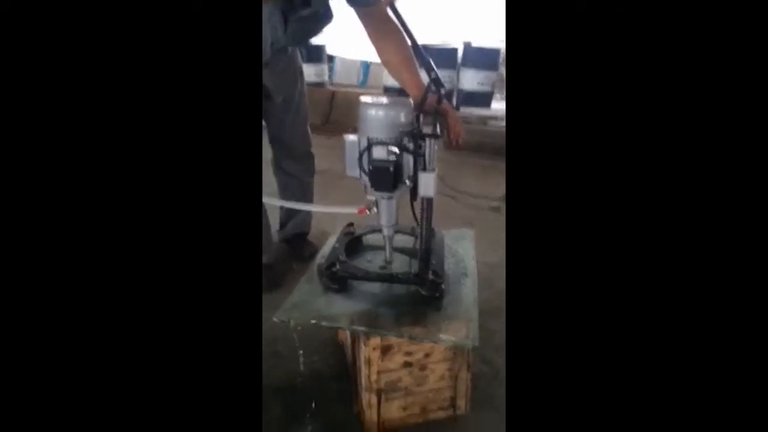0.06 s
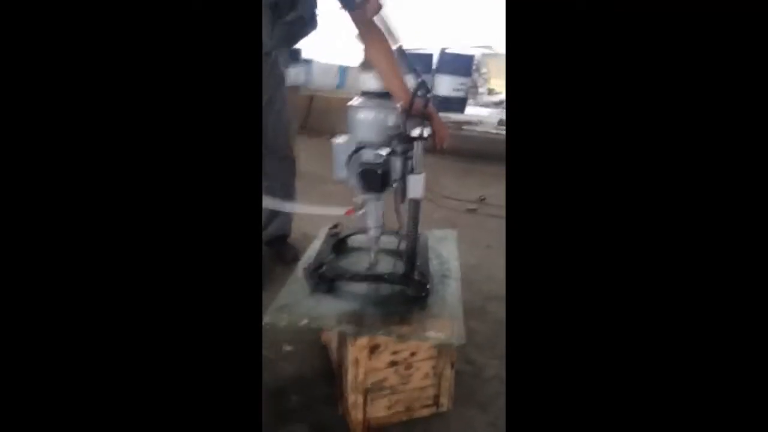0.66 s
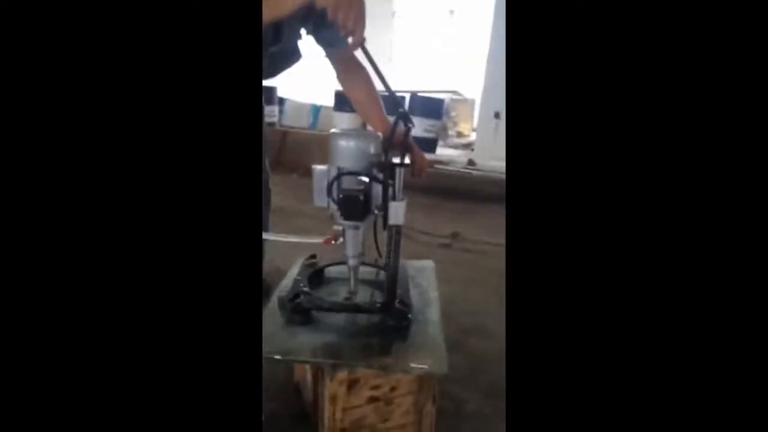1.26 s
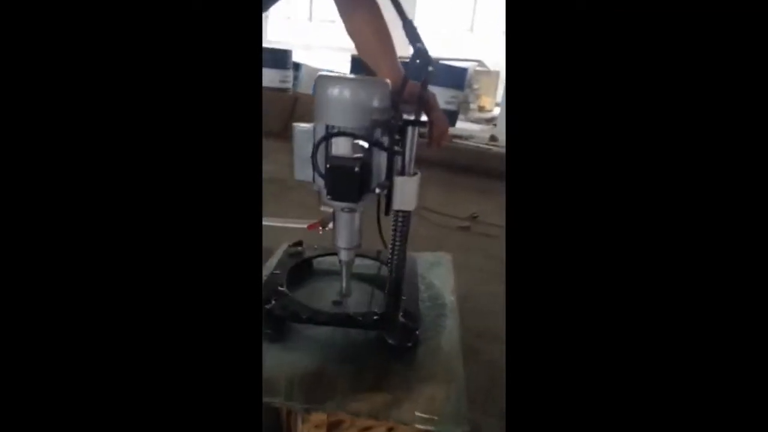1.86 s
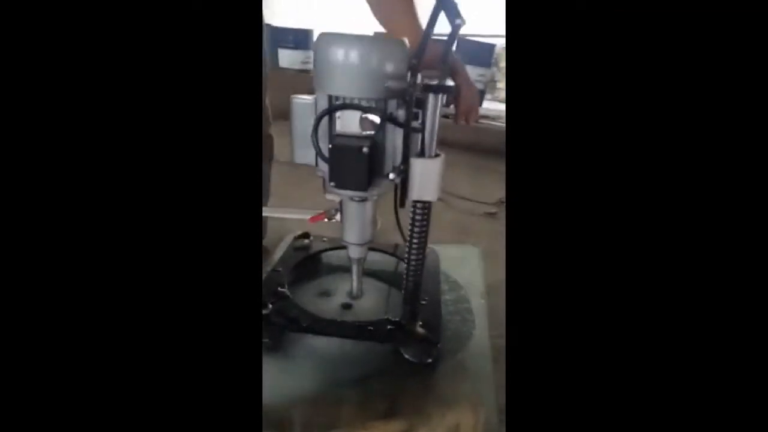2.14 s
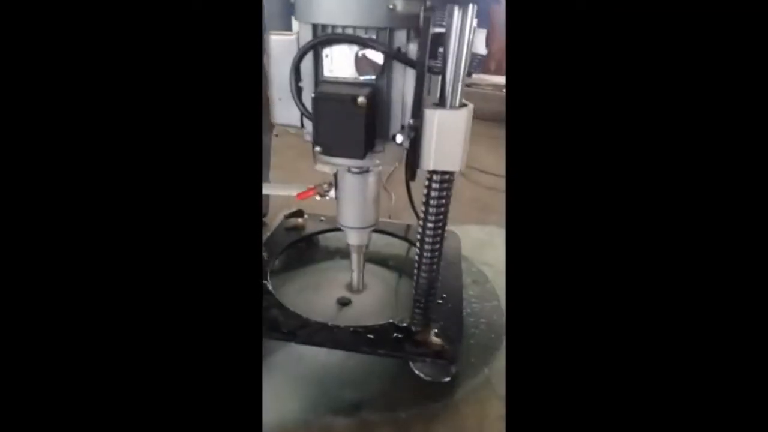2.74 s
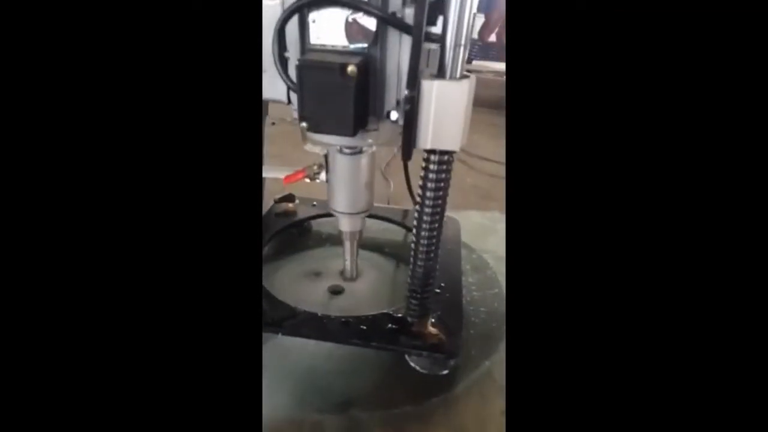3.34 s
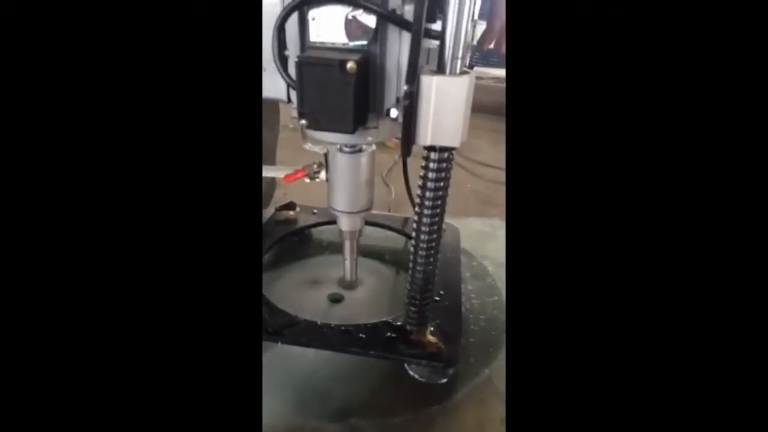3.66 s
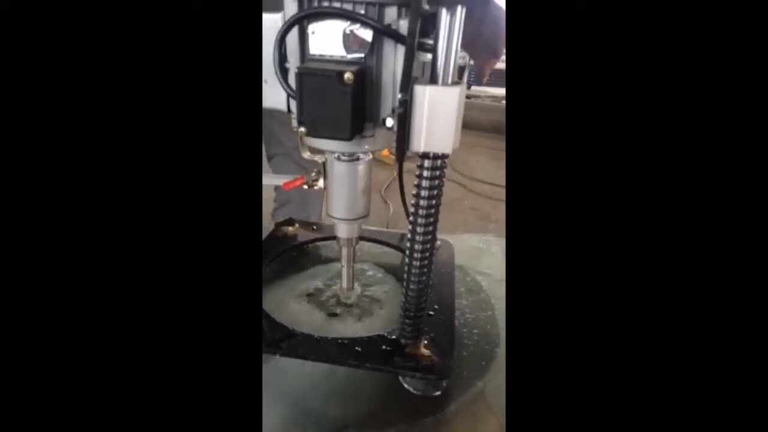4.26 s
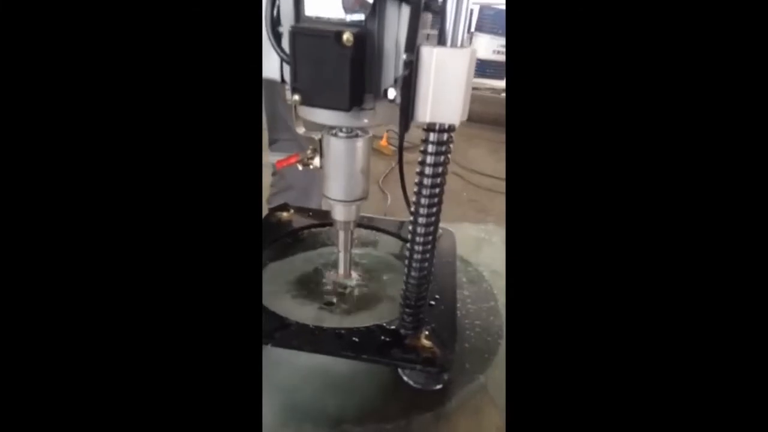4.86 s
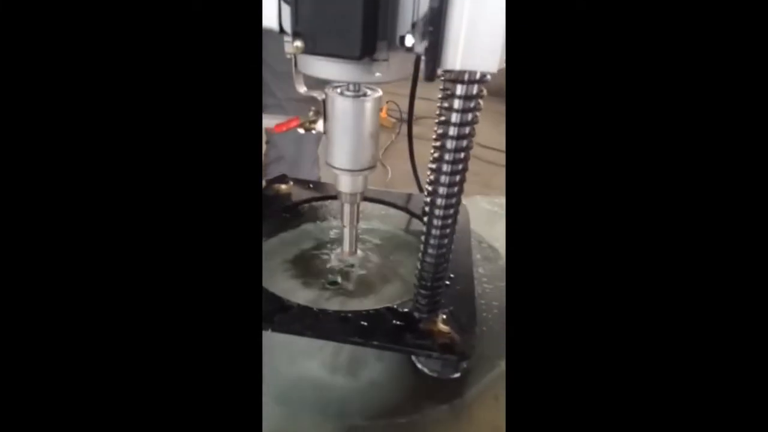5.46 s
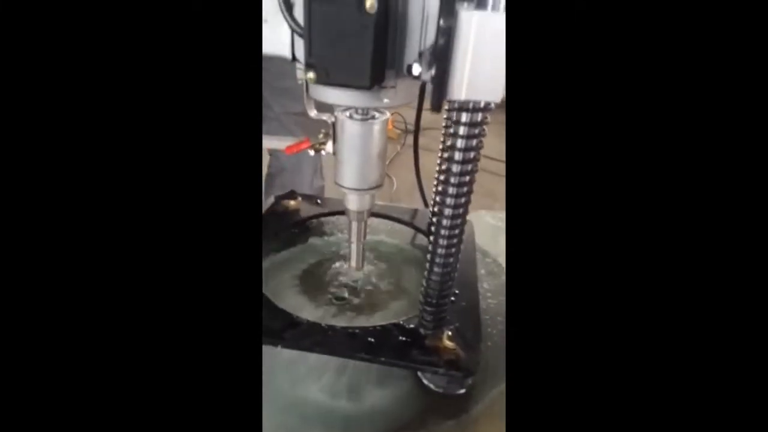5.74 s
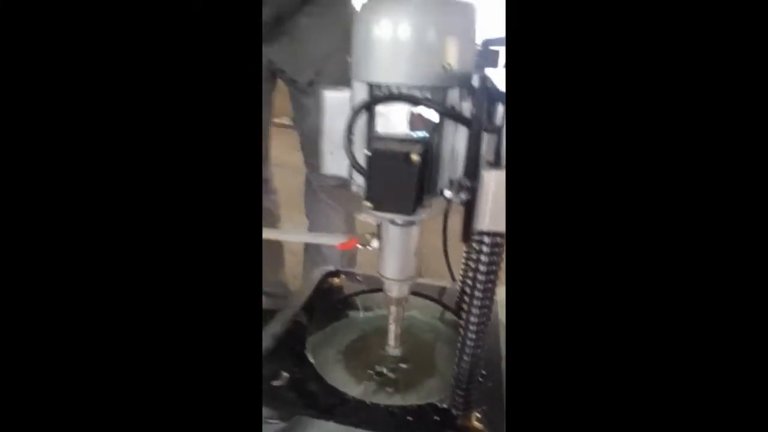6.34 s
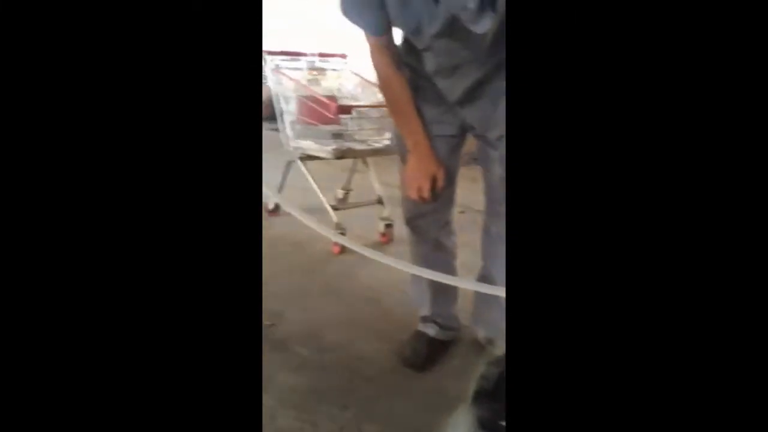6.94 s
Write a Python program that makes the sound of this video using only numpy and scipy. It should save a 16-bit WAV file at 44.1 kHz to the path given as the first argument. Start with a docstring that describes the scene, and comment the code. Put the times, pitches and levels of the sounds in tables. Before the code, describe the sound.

A wet drill grinds and squeals through glass, breaks through with a crunch, whirs freely, then clicks off amid dripping water.

```python
"""A gritty, squealing grind is heard first: a wet diamond core drill crushes a glass sheet and excites
the modes of bit and sheet, until the core breaks out with a crunch. Friction rings the steel tube as it
is drawn out along the rim. The motor runs free, its rolling bearings whirring and its windings humming,
then is switched off and coasts to rest. Cooling water drips on the glass, each impact a damped ring,
while feet shuffle on the concrete of a reverberant workshop."""
import sys
import numpy as np
from scipy import signal
from scipy.fft import rfft, irfft, next_fast_len
from scipy.io import wavfile
from scipy.ndimage import uniform_filter1d

SR = 44100
rng = np.random.default_rng(int(sys.argv[2]) if len(sys.argv) > 2 else 0)


def persist_wave(psi):
    """Save psi, clipped to +-1, as 16-bit WAV."""
    counts = np.round(np.clip(psi, -1, 1) * 32767).astype(np.int16)
    wavfile.write(sys.argv[1], SR, np.atleast_2d(counts).T)


N = 313551
TIME = np.arange(N) / SR
BREAK_S, SWITCH_OFF_S, SPINDLE_HZ = 2.164, 5.067, 24.02
COASTING = np.maximum(TIME - SWITCH_OFF_S, 0)  # time since switch-off/s


def from_db(db):
    """Amplitude ratio: a factor of ten for every 20 dB."""
    return 10 ** (np.asarray(db) / 20)


def rms_one(x):
    """Normalisation to unit mean power."""
    return x / np.sqrt(np.mean(x ** 2) + 1e-20)


def in_time(rows):
    """Linear interpolation of (t/s, value) rows at every sample."""
    return np.interp(TIME, *np.transpose(rows))


def noise():
    """White noise: equal mean power at all frequencies."""
    return rng.standard_normal(N)


def drift(hz):
    """Slow random fluctuation: low-pass filtered noise of unit spread."""
    pole = np.exp(-80 * np.pi * hz / SR)
    slow = signal.lfilter([1], [1, -2 * pole, pole * pole], rng.standard_normal(N // 40 + 2002))[2000:]
    return np.interp(np.arange(N) / 40, np.arange(len(slow)), rms_one(slow))


def grains(per_s, spread_db):
    """Shot noise: independent tiny impacts of uneven size."""
    sizes = from_db(spread_db * np.minimum(rng.exponential(1, N), 4))
    return rms_one(sizes * rng.choice([-1, 1], N) * (rng.random(N) < per_s / SR))


def colour(x, spectrum):
    """Spectral shaping by (f/Hz, level/dB) rows, falling 24 dB an octave beyond their ends; rms 1."""
    size = next_fast_len(N)
    octave = np.log2(np.maximum(np.fft.rfftfreq(size, 1 / SR), 1))
    hz, db = np.transpose(spectrum)
    beyond = np.abs(octave - np.clip(octave, np.log2(hz[0]), np.log2(hz[-1])))
    gain = from_db(np.interp(octave, np.log2(hz), db) - 24 * beyond)
    return rms_one(irfft(rfft(x, size) * gain, size)[:N])


def resonate(x, modes):
    """Modal superposition of (f/Hz, bandwidth/Hz, level/dB) rows; white input keeps its level."""
    out, power = np.zeros(N), 0
    for k, (hz, width, db) in enumerate(sorted(modes)):
        radius, gain = np.exp(-np.pi * width / SR), from_db(db) * (-1) ** k
        scale = (1 - radius * radius) / 2
        feedback = [1, -2 * radius * np.cos(2 * np.pi * hz / SR), radius * radius]
        out += gain * signal.lfilter([scale, 0, -scale], feedback, x + 1e-18)
        power += gain ** 2 * scale
    return out / np.sqrt(power)


def blows(rows):
    """Transient envelopes: Gaussian rise, exponential decay; rows of (t/s, level/dB, rise/s, T60/s)."""
    out = np.zeros(N)
    for start, db, rise, t60 in rows:
        age = TIME - start
        fall_db = np.where(age < 0, 9 * (age / rise) ** 2, 60 * age / t60)
        out += from_db(db - np.minimum(fall_db, 200))
    return out


def held(start, end, attack_s=0.012, release_s=0.04):
    """Sustained envelope: Gaussian rise up to the start, then from the end a 60 dB decay per release."""
    early, late = np.maximum(start - TIME, 0), np.maximum(TIME - end, 0)
    fall_db = 9 * (early / attack_s) ** 2 + 60 * late / release_s
    return from_db(-np.minimum(fall_db, 200))


def steady(ring, window_s=0.03, share=0.55):
    """Compression: dividing by the running level evens out slow swells and keeps quick flutter."""
    power = uniform_filter1d(ring ** 2, size=int(window_s * SR) + 1)
    return rms_one(ring / (power + .05) ** (.5 * share))


def turning(swing_db, flutter_db):
    """Amplitude modulation by eccentricity: the bit's pressure peaks once a turn, unevenly."""
    last_touch_s = RIM_TOUCHES[-1][0]
    angle = 2 * np.pi * (SPINDLE_HZ * (TIME - last_touch_s) + 0.07 * drift(3.4))
    return from_db(swing_db * (np.cos(angle) + 0.1 * np.cos(2 * angle)) + flutter_db * drift(39))


# a soft low swell (t/s, level/dB, rise/s, T60/s) and its spectrum (f/Hz, level/dB)
SWELL = [(5.98, -45.5, 0.23, 1)]
SWELL_SPECTRUM = [(120, -38), (190, 5), (250, 2), (350, -14), (700, -17), (1200, -24)]
# low rumble of a microphone being moved (t/s, level/dB) and its spectrum (f/Hz, level/dB)
HANDLING_LEVEL = [(0.1, -51), (0.21, -57), (1.81, -61), (3.16, -45.5), (4.25, -46), (4.52, -58),
                  (4.73, -51), (5.7, -51), (7.0, -50.5)]
HANDLING_SPECTRUM = [(25, -30), (40, -10), (52, 2), (66, 0), (80, -7)]
# steady air of the workshop (f/Hz, level/dB)
AIR_SPECTRUM = [(50, -36), (85, 0.5), (140, 3.5), (160, -2), (264, 0.5), (350, -7.5), (734, -9),
                (1210, -15), (1510, -14.5), (3160, -18.5), (8240, -23.5), (15500, -29)]

def background():
    """Incoherent addition: broadband air and low rumbles that swell and fade."""
    swell = blows(SWELL) * colour(noise(), SWELL_SPECTRUM)
    handling = from_db(in_time(HANDLING_LEVEL) + 2 * drift(2.5)) * colour(noise(), HANDLING_SPECTRUM)
    air = from_db(-52.5 + 0.89 * drift(3.3)) * colour(noise(), AIR_SPECTRUM)
    return swell + handling + air


# scuff of a shoe (t/s, level/dB, rise/s, T60/s) and its spectrum (f/Hz, level/dB)
SCUFFS = [(6.65, -45.5, 0.069, 0.39)]
SCUFF_SPECTRUM = [(300, -6), (700, 2), (1000, 1), (1500, -11), (4000, -12), (12000, -25)]

def feet():
    """Sliding friction: a sole on concrete makes a dense run of tiny impacts."""
    return blows(SCUFFS) * colour(grains(per_s=3000, spread_db=0.5), SCUFF_SPECTRUM)


# patter of the trickle (f/Hz, level/dB)
TRICKLE_SPECTRUM = [(1180, -44), (2000, -21), (2540, -8), (3180, -11), (4550, -7.5), (8360, -16),
                    (15500, -11)]
# resonances of the water tap (f/Hz, bandwidth/Hz, level/dB)
TAP_MODES = [(1866, 14, 8), (3130, 120, -2.5), (3470, 110, 1.5), (3660, 100, -3.5), (4000, 70, -2)]

def trickle(start_s=6.13, fade_db_per_s=4):
    """Flow noise: water hisses through the resonances of its tap over a fine patter of impacts."""
    flow = from_db(-62 - fade_db_per_s * (TIME - start_s)) * held(start_s, TIME[-1], attack_s=0.03)
    patter = colour(grains(per_s=600, spread_db=4), TRICKLE_SPECTRUM)
    hiss = from_db(1 + 1.2 * drift(5)) * resonate(noise(), TAP_MODES)
    return flow * (patter + hiss)


def spatter(peak_s=5.9, width_s=0.24):
    """Shot noise in eight bands: the stopping spindle sheds its water as fine ticking droplets."""
    pitches_hz = np.geomspace(6000, 14600, num=8)
    ticks = sum(resonate(grains(per_s=25, spread_db=2.2), [(hz, 1200, 0)]) for hz in pitches_hz)
    shower = np.exp(-((TIME - peak_s) / width_s) ** 2)
    return from_db(-61.5) * shower * rms_one(ticks)


# larger drops landing on wet glass (t/s, level/dB, f/Hz)
DROPS = [(3.158, -32, 12400), (5.663, -48, 7600), (5.7279, -47, 7200), (5.798, -45, 10900),
         (5.8337, -40, 7150), (5.8544, -44, 9020), (5.8833, -42, 5400), (5.897, -44, 10500),
         (5.9433, -49, 8150), (5.9616, -42, 6270), (6.0401, -45.5, 11200), (6.0635, -46, 7690),
         (6.124, -46, 6800), (6.238, -31, 2960), (6.3523, -47, 10300), (6.4028, -45, 3280),
         (6.7486, -45, 10200), (6.7928, -42, 3880), (6.8944, -42, 4000), (6.909, -39, 3750),
         (7.047, -30.5, 3420)]

def drips():
    """Impact excitation: each drop's splat drives three damped rings and a faint broad band."""
    out = np.zeros(N)
    for start, db, hz in DROPS:
        splat = blows([(start + 0.0016, db - 4, .001, .03)]) * noise()
        modes = [(hz, 260, 0), (1.18 * hz, 300, -2.5), (1.29 * hz, 450, -6), (7000, 6000, -20)]
        out += resonate(splat, modes)
    return out


# snap of the switch (t/s, level/dB, rise/s, T60/s) and its modes (f/Hz, bandwidth/Hz, level/dB)
SWITCH_SNAPS = [(5.0722, -19, 0.001, 0.042), (5.0757, -5, 0.0026, 0.024), (5.079, -26.5, 0.00058, 0.38)]
SWITCH_MODES = [(523, 31, -4), (577, 52, -7), (714, 55, 12), (830, 79, 6), (1050, 60, 8), (1450, 89, 6.5),
                (1810, 96, -1), (2280, 500, -3), (3330, 440, 2), (4140, 490, 0), (5600, 1000, -8),
                (7300, 1300, -10), (9700, 770, -10), (13600, 1900, -12.5)]

def switch():
    """Transient response: the snap of the switch briefly excites its damped modes."""
    return resonate(blows(SWITCH_SNAPS) * noise(), SWITCH_MODES)


# clink of the feed lever (t/s, level/dB, rise/s, T60/s) and its modes (f/Hz, bandwidth/Hz, level/dB)
LEVER_CLINKS = [(5.289, -20.5, 0.0025, 0.044), (5.296, -31, 0.01, 0.1), (5.311, -36, 0.003, 0.094)]
LEVER_MODES = [(2910, 300, -7.5), (4120, 230, 3.5), (5240, 390, -1), (6860, 800, -12), (13200, 2300, -14.5)]

def lever():
    """Impact excitation: quick contacts ring the high modes of the steel feed lever."""
    return resonate(blows(LEVER_CLINKS) * noise(), LEVER_MODES)


# jolts of the feed slide (t/s, level/dB, f/Hz) and its run up the column (t/s, level/dB, rise/s, T60/s)
JOLTS = [(0.507, -29, 322), (2.163, -16, 204), (2.323, -25, 274), (2.356, -33.5, 251), (3.013, -27, 227),
         (3.77, -29, 191)]
SLIDE_TRAVEL = [(2.65, -31.5, 0.32, 2.5)]
# body of the stand (f/Hz, level/dB) and its modes (f/Hz, bandwidth/Hz, level/dB)
STAND_SPECTRUM = [(100, -50), (190, 0.5), (270, 1), (450, -6), (900, -2), (2000, -3.5)]
STAND_MODES = [(197.6, 15, -3), (265, 27, 2.5), (337, 32, -3.5), (385, 21, -2), (714, 52, -4.5)]

def stand(rise_s=0.0042, t60=0.19):
    """Structure-borne sound: the slide rattles the stand, and each jolt booms at one pitch."""
    shaking = blows([(start, db - 4, rise_s, t60) for start, db, _ in JOLTS] + SLIDE_TRAVEL)
    rattle = from_db(-3) * shaking * colour(noise(), STAND_SPECTRUM)
    ring = from_db(-4) * resonate(shaking * noise(), STAND_MODES)
    booms = sum(blows([(start, db, rise_s, t60)]) * np.sin(2 * np.pi * hz * (TIME - start))
                for start, db, hz in JOLTS)
    return rattle + ring + booms


# judders of the spindle (t/s, level/dB, rise/s, T60/s) and their modes (f/Hz, bandwidth/Hz, level/dB)
JUDDERS = [(5.61, -50, 0.051, 0.2), (5.663, -45, 0.02, 0.12), (5.703, -45, 0.0098, 0.084),
           (5.733, -47, 0.0055, 0.062), (5.76, -57, 0.0069, 0.1)]
JUDDER_MODES = [(960, 140, 2), (1240, 180, -6), (1730, 160, -6)]

def last_turn():
    """Stick-slip friction: the spindle judders against its wet seal just before it stands still."""
    return resonate(blows(JUDDERS) * grains(per_s=5000, spread_db=2.5), JUDDER_MODES)


# mains hum of the windings (f/Hz, level/dB)
HUM_TONES = [(100, -49.5), (199.6, -51)]

def mains_hum(distance, fade_db_per_s=131):
    """Magnetic forces: the windings hum at twice and four times mains frequency until switch-off."""
    hum = sum(from_db(db + 1.2 * drift(8)) * np.sin(2 * np.pi * (hz * TIME + .03 * drift(3)))
              for hz, db in HUM_TONES)
    return from_db(-3.5 - fade_db_per_s * COASTING) / distance ** 1.05 * hum


# resonances of the wet swivel seal (f/Hz, bandwidth/Hz, level/dB)
SEAL_MODES = [(2360, 400, -2), (3314, 133, 2), (3594, 130, 2.5), (5980, 170, -8), (7600, 740, -16.5),
              (9950, 980, -15.5)]

def seal():
    """Friction noise: the seal chafes on the spindle and fades after switch-off."""
    tilt = [(1500, 3), (10500, -5), (12000, -7), (15500, -21)]
    return from_db(-11 - 55 * COASTING) * colour(resonate(noise(), SEAL_MODES), tilt)


# modes of the motor housing (f/Hz, bandwidth/Hz, level/dB)
HOUSING_MODES = [(1575, 39, -13), (1630, 9.7, 4.5), (1649, 20, -6.5), (1749, 13, 5), (1786, 35, 0.5),
                 (1828, 51, -4.5), (1873, 13.5, -5.5), (1950, 9, -14)]

def housing(ball_passes, run, cage_hz=6):
    """Forced vibration: the balls drive the housing, which swells with each turn of their cage."""
    cage_db = 2.5 * np.sin(2 * np.pi * (cage_hz * run + .25 * drift(1.2)))
    drag_db = 2.5 * held(*RIM_TOUCHES[-1][:2])  # louder while the tube drags on the rim
    return from_db(-4.5 + cage_db + drag_db) * steady(resonate(noise() * ball_passes, HOUSING_MODES))


# modes of the motor's end shield (f/Hz, bandwidth/Hz, level/dB)
SHIELD_MODES = [(1091, 21, -3.5), (1170, 22, 0), (1228.5, 15.4, 4.5), (1300, 35, 2), (1328, 23, 7.5),
                (1403, 30, -12)]

def end_shield(ball_passes, facing_s=3.34, width_s=0.49):
    """Directivity: the ringing end shield is loudest while it faces the listener."""
    facing = np.exp(-((TIME - facing_s) / width_s) ** 2)
    return from_db(-14.5 + 10 * facing) * steady(resonate(noise() * ball_passes, SHIELD_MODES))


def singing(rows, run):
    """Rotational tones: each wavers slightly, its frequency proportional to the motor's speed."""
    return sum(from_db(db + 2 * drift(6)) * np.sin(2 * np.pi * (hz * run + .07 * drift(6)))
               for hz, db in rows)


# tones of the motor's bearings and of the lower spindle bearing (f/Hz, level/dB)
BEARING_TONES = [(441.4, -54.5), (543.7, -62.5), (581.4, -49.5), (646, -60), (667.5, -44), (742.9, -47.5),
                 (769.8, -44), (818.3, -48.5), (866.7, -55.5), (1158, -43), (1228, -30.5), (1329, -37.5),
                 (1593, -38), (1642, -28.5), (1762, -25), (1788, -32), (1836, -37)]
SPINDLE_TONES = [(1228, -35.5), (1432, -27)]

def bearing_tones(run, beside_s=4.66):
    """Periodic rolling contact gives a line spectrum; the lower bearing is heard only from beside it."""
    beside = held(beside_s, TIME[-1], attack_s=0.3)
    tones = singing(BEARING_TONES, run) + beside * singing(SPINDLE_TONES, run)
    return from_db(14 - 180 * COASTING) * tones


def run_down(stop_s, power):
    """Constant friction brakes evenly; the amplitude follows a power of the motion that is left."""
    return np.maximum(1 - COASTING / stop_s, 1e-9) ** power


# broad whirr of the bearings (f/Hz, level/dB)
WHIRR_SPECTRUM = [(150, -31), (220, -7.5), (330, -42), (500, -32), (750, -18.5), (980, -17.5), (1150, -7.5),
                  (1440, -3), (1520, -9), (1850, -1.5), (2030, -9), (2300, -13.5), (2900, -17.5),
                  (3550, -12.5), (4300, -24.5), (9900, -30), (15500, -44.5)]

def motor(distance, ball_pass_hz=144):
    """Rolling-contact noise: passing balls modulate the rattle; pitch and level sink after switch-off."""
    speed = np.exp(-.25 * COASTING) * (1 + 0.00032 * drift(1.06))
    run = np.cumsum(speed) / SR  # rotation, in seconds at full speed
    ball_phase = 2 * np.pi * (ball_pass_hz * run + 0.41 * drift(4.2))
    ball_passes = from_db(1.56 * np.sin(ball_phase) + drift(28))
    housing_ring = housing(ball_passes, run)
    shield_ring = end_shield(ball_passes)
    whirr = from_db(-9) * colour(noise() * ball_passes, WHIRR_SPECTRUM)
    chafe = seal()
    throb = turning(swing_db=3.3, flutter_db=0.8)
    rattle = housing_ring + throb ** 0.25 * (shield_ring + whirr) + throb * chafe + bearing_tones(run)
    last_roll = from_db(-14) * run_down(stop_s=0.9, power=0.99) * whirr
    gain = from_db(-28.5 - 3.6 * (TIME < BREAK_S)) / distance ** 0.55
    return gain * (run_down(stop_s=0.46, power=1.12) * rattle + last_roll)


# the tube touches the rim (start/s, end/s, level/dB); spectrum of the scrape (f/Hz, level/dB)
RIM_TOUCHES = [(2.17, 2.256, -27), (2.266, 2.424, -42), (2.437, 3.009, -24.3)]
RIM_SPECTRUM = [(120, -92), (200, -38), (345, -54), (392, -9), (534, -19), (940, -25), (1190, -5.5),
                (1810, -8), (2060, -16), (3550, -12), (4410, -17.5), (5750, -13.5), (7350, -14.5),
                (15500, -28)]
# its tip knocks on the glass (t/s, level/dB, rise/s, T60/s)
TIP_KNOCKS = [(2.161, -14, 0.005, 0.027), (2.326, -28, 0.0037, 0.05), (2.353, -45, 0.0026, 0.04)]
# modes of the bare steel tube (f/Hz, bandwidth/Hz, level/dB)
TUBE_MODES = [(2430, 90, -6), (4670, 130, -13), (6140, 490, -18), (7434, 28, 10.5), (8400, 430, -11.5),
              (11100, 600, -18), (12500, 2500, -24), (14700, 1900, -9.5)]

def rubbing(exit_s=3.007, ease_db_per_s=6, swell_db_per_s=98):
    """Sliding friction: the tube scrapes the rim; its tip rings ever louder and catches as it leaves."""
    touch = sum(from_db(db - ease_db_per_s * (TIME - start)) * held(start, end)
                for start, end, db in RIM_TOUCHES)
    catch = from_db(-17) * held(exit_s, exit_s)
    contact = touch + catch + blows(TIP_KNOCKS)
    scrape = contact * colour(grains(per_s=11000, spread_db=0), RIM_SPECTRUM)
    tip_db = -20 - swell_db_per_s * np.maximum(exit_s - TIME, 0)
    ring_level = from_db(tip_db) * held(BREAK_S, exit_s) + from_db(-11.5) * touch
    return turning(swing_db=1.5, flutter_db=2) * (scrape + ring_level * resonate(noise(), TUBE_MODES))


# crunches of the glass (t/s, level/dB, rise/s, T60/s) and their spectrum (f/Hz, level/dB)
CRUNCHES = [(2.164, -10.5, 0.0061, 0.15), (3.008, -23.5, 0.013, 0.15)]
CRUNCH_SPECTRUM = [(110, -8), (150, 0), (205, -1.5), (380, -2), (650, 8), (980, 8.5), (1150, 2), (1560, 8),
                   (2000, -19), (2320, 13), (2600, -10), (3200, 2.5), (3500, -29), (7300, -21),
                   (14000, -17.5)]

def breakthrough():
    """Brittle fracture: bursts of tiny cracks as the core breaks out and later the tip hits the edge."""
    return blows(CRUNCHES) * colour(grains(per_s=9600, spread_db=2), CRUNCH_SPECTRUM)


# faint high ringing over the grind (f/Hz, bandwidth/Hz, level/dB)
HIGH_RINGS = [(7460, 340, -8), (8650, 200, -2), (9400, 240, -1), (10100, 220, -12), (10720, 200, 7),
              (11600, 260, 0), (12200, 110, 7), (12700, 200, 0), (13500, 170, 10), (13900, 200, -2),
              (14420, 110, 1), (14950, 220, -5)]

def high_ringing():
    """Narrow-band noise: faint high rings over the grind, each wavering in level on its own."""
    ticks = grains(per_s=7000, spread_db=5)
    return rms_one(sum(from_db(db + 1.5 * drift(4)) * resonate(ticks, [(hz, width, 0)])
                       for hz, width, db in HIGH_RINGS))


def friction_ring(drive, hz, width):
    """Saturation: friction feeds a weak ring and checks a strong one, tending to a steady squeal."""
    ring = resonate(drive, [(hz, width, 0)])
    power = uniform_filter1d(ring ** 2, size=220)
    return rms_one(ring / (power + .05) ** .3)


# modes of bit and sheet (f/Hz, bandwidth/Hz, level/dB, depth of strongest ring, loss a full depth away/dB)
GROOVE_MODES = [(276, 67, -25.5, 0.34, 47), (666, 14, -22, 0.029, 16), (771, 22, -21, 0.39, 7),
                (911.6, 12, -15.5, 0.52, 8), (1015, 32, -16, 0, 10), (1082, 9.2, -15.5, 0, 11),
                (1505, 29, -23.5, 0.29, 28), (1556, 16, -14, 0.71, 30), (1640, 92, -14.5, 0.49, 4),
                (1723, 22, -24.5, 0, 27), (1968, 22, -16.5, 0.82, 10), (2200, 39, -15.5, 1, 20),
                (2432, 50, -16.5, 0.17, 13), (2530, 43, -11, 0.00048, 20.5), (2713, 46, -12.5, 0.51, 6),
                (2987, 48, -11, 0, 22), (3062, 35, -18.5, 1, 22), (3335, 31, -23, 0.84, 21),
                (3514, 95, -23, 0.68, 29), (3560, 52, -19, 0.25, 20), (3767, 24, -20.5, 0.59, 26),
                (4070, 110, -20.5, 0.15, 8), (4330, 70, -23.5, 0.12, 19), (4840, 52, -21.5, 1, 7),
                (4980, 57, -34, 0.6, 4), (5305, 32, -25.5, 1, 7), (5390, 32, -26, 0.5, 6),
                (6135, 27, -22.5, 0.27, 6), (6350, 44, -27, 0.42, 4), (6380, 65, -34, 0.99, 13),
                (6780, 86, -20.5, 0.67, 11), (7180, 51, -23, 1, 17), (7470, 24, -17.5, 0.38, 12),
                (8770, 90, -22, 0.59, 29)]
# the bit grabs and one mode squeals (start/s, end/s, f/Hz, bandwidth/Hz, level/dB)
SQUEALS = [(0.037, 0.286, 7485, 36, -16), (0.557, 0.624, 2720, 24, -9), (0.853, 1.02, 7500, 31, -12.5),
           (0.873, 1.063, 6160, 58, -15.5), (0.906, 1.34, 3585, 23, -14.5), (0.916, 1.16, 3046, 37, -9.5),
           (1.04, 1.323, 4250, 30, -16.5), (1.173, 1.275, 5320, 170, -15.5), (1.192, 1.29, 7430, 89, -14),
           (1.286, 1.323, 907, 7.7, -13), (1.29, 1.39, 1574, 16, -14.5), (1.4, 1.594, 6140, 35, -12.5),
           (1.418, 1.506, 2726, 25, -8.5), (1.43, 1.69, 1641, 19, -12.5), (1.52, 2.09, 6380, 66, -20.5),
           (1.634, 2.096, 6190, 50, -14.5), (1.73, 2.147, 4710, 110, -14), (1.837, 2.15, 7500, 34, -14),
           (1.88, 2.154, 4280, 30, -17.5), (1.924, 1.996, 909, 6, -8)]

def groove_ringing(depth):
    """Friction-driven resonance: each mode peaks at its own depth; a grabbing bit makes one squeal."""
    grit = grains(per_s=20000, spread_db=3.5)
    out = np.zeros(N)
    for hz, width, db, best_depth, loss_db in GROOVE_MODES:
        surge_db = 1.6 * drift(8)  # the grit bites unevenly
        level = from_db(db - loss_db * (depth - best_depth) ** 2 + surge_db)
        out += level * friction_ring(grit, hz, width)
    slips = noise()
    for start, end, hz, width, db in SQUEALS:
        grab = held(start, end, attack_s=0.02, release_s=0.14)
        out += from_db(db) * grab * friction_ring(slips, hz, width)
    return out


# depth of the bit in its groove (t/s, fraction of full depth)
GROOVE_DEPTH = [(0, 0.17), (0.75, 0.2), (1.05, 0.55), (1.4, 0.84), (2.15, 1)]
# glass crushed under the grit (f/Hz, level/dB)
CRUSH_SPECTRUM = [(120, -36), (200, -36), (330, -36), (460, -55), (620, -9.5), (1000, 0.5), (1250, -7),
                  (1550, 1), (2700, 5), (4000, -6.5), (4700, -7), (5700, -3), (7400, -0.5), (8200, -31),
                  (9000, -15), (12000, -12.5), (15500, -27)]

def grinding(release_db_per_s=260):
    """Abrasion: diamond grit crushes the glass and rings bit and sheet, louder as the groove deepens."""
    depth = in_time(GROOVE_DEPTH)
    ringing = from_db(0.5) * groove_ringing(depth) + from_db(-19 + 2 * depth) * high_ringing()
    crush = from_db(-9.3) * colour(grains(per_s=7000, spread_db=3.5), CRUSH_SPECTRUM)
    released_db = release_db_per_s * np.maximum(TIME - BREAK_S, 0)  # nothing to cut once the core is free
    level = from_db(-18 + 3.5 * depth - released_db)
    return level * turning(swing_db=0.6, flutter_db=0.55) * (ringing + crush)


def workshop(x, wet_db, t60, treble_t60, split_hz):
    """Reverberation: the diffuse field of a hard room decays exponentially, the treble sooner."""
    age = TIME[:SR]
    echoes = rng.standard_normal(SR)
    low, high = (signal.sosfilt(signal.butter(2, split_hz, kind, fs=SR, output="sos"), echoes)
                 for kind in ("low", "high"))
    tail = (low * from_db(-60 * age / t60) - high * from_db(-60 * age / treble_t60)) * (age > .004)
    return x + from_db(wet_db) * signal.fftconvolve(x, tail / np.sqrt(np.sum(tail ** 2)))[:N]


# the listener approaches the motor (t/s, distance/m)
MOTOR_DISTANCE = [(0.3, 1.46), (2.1, 1.02), (2.6, 0.4), (5.0, 0.27)]

def scene():
    """Superposition: all sources add at one listening point, the motor louder as it is approached."""
    distance = in_time(MOTOR_DISTANCE)
    whirr, hum = motor(distance), mains_hum(distance)
    drill = grinding() + rubbing() + whirr + last_turn()
    knocks = breakthrough() + stand() + switch() + lever()
    water = trickle() + spatter() + drips()
    room = workshop(drill + knocks + water, wet_db=-18, t60=.65, treble_t60=.5, split_hz=4000)
    return np.stack([room + hum + feet() + background()] * 2)


def record(dry):
    """Soft saturation rounds the peaks, and a steep low-pass filter cuts the top."""
    ceiling, cutoff_hz = 1.1, 15600
    lowpass = signal.ellip(12, .1, 80, cutoff_hz, fs=SR, output="sos")
    return signal.sosfilt(lowpass, ceiling * np.tanh(dry / ceiling))


dry = scene()
out = record(dry)
persist_wave(out)
```